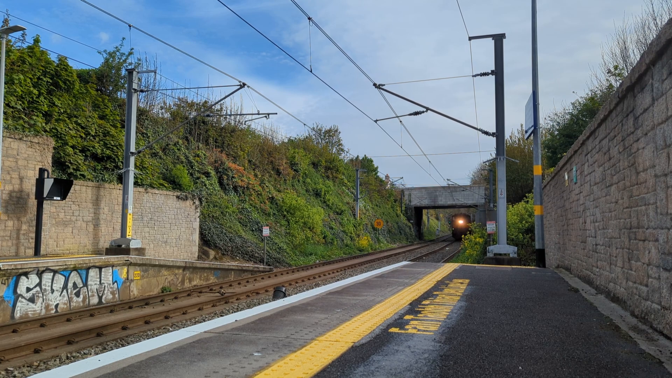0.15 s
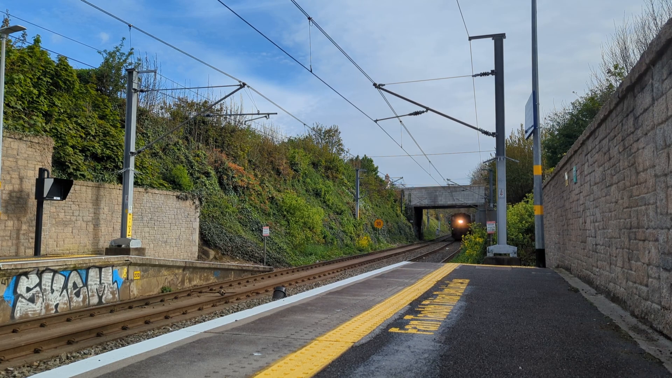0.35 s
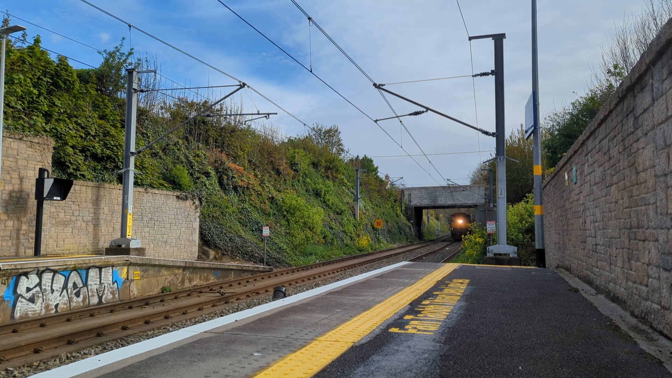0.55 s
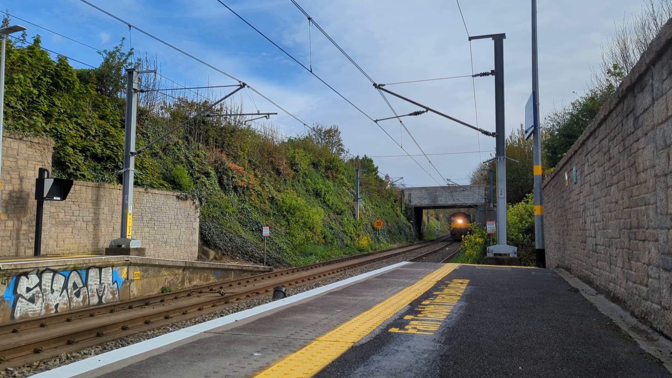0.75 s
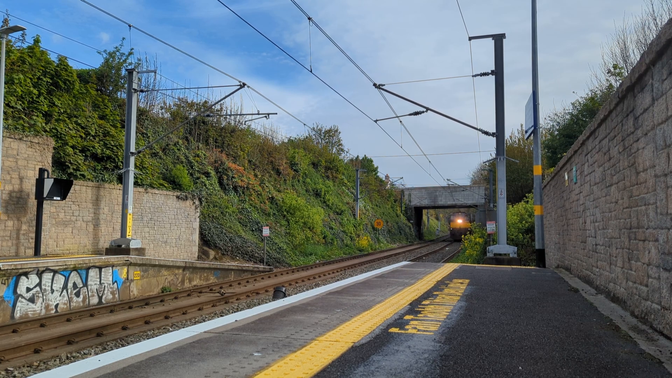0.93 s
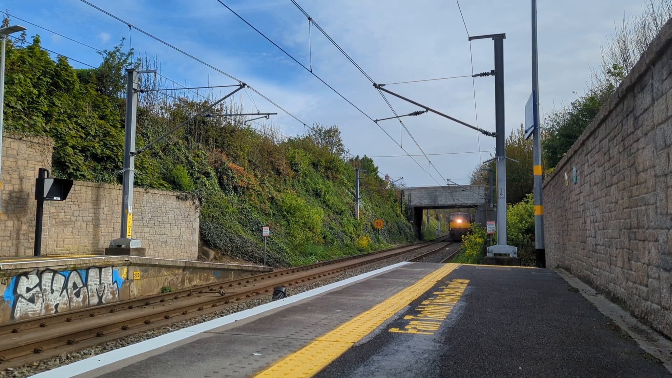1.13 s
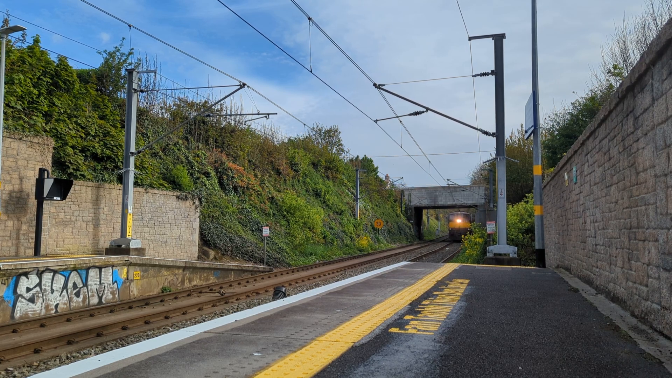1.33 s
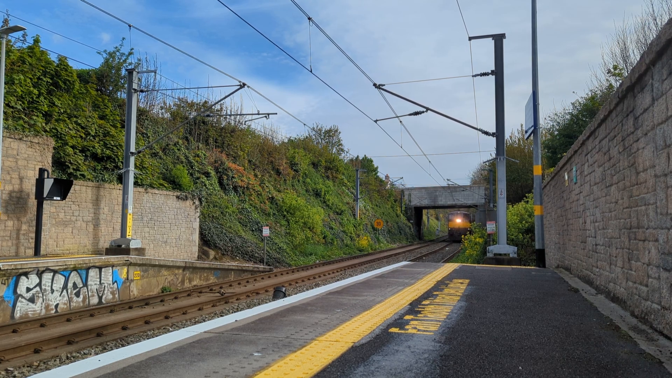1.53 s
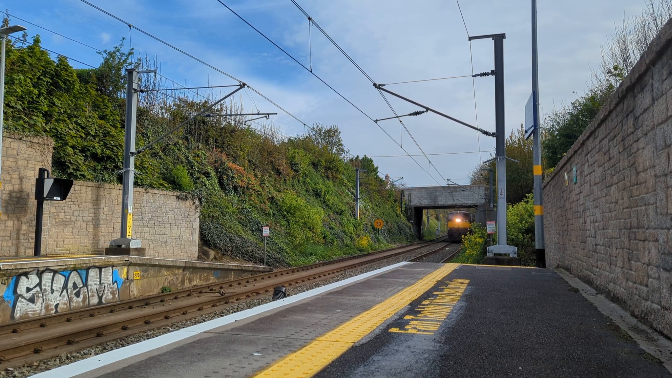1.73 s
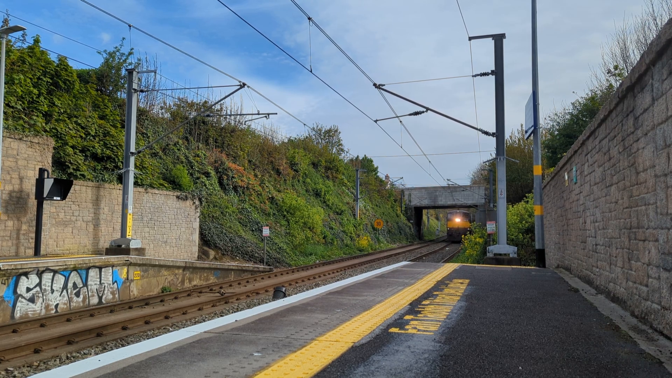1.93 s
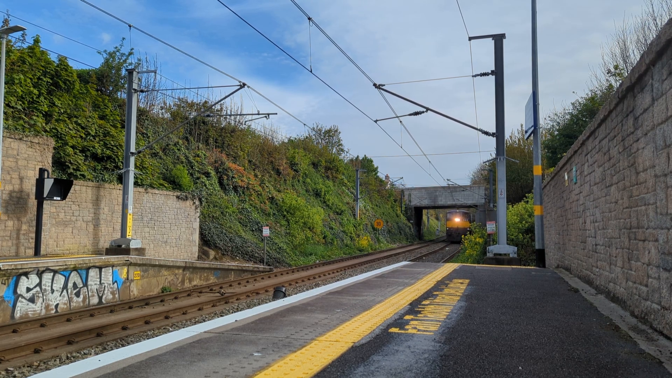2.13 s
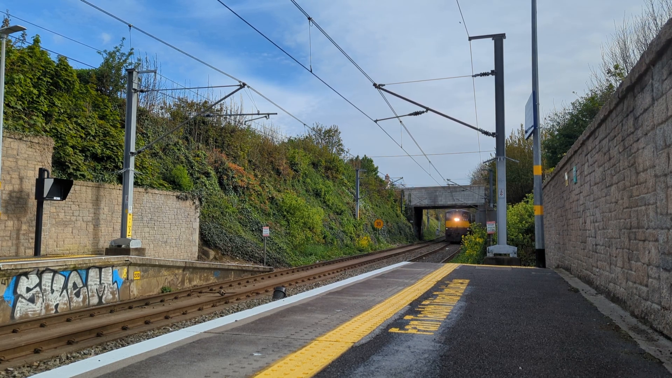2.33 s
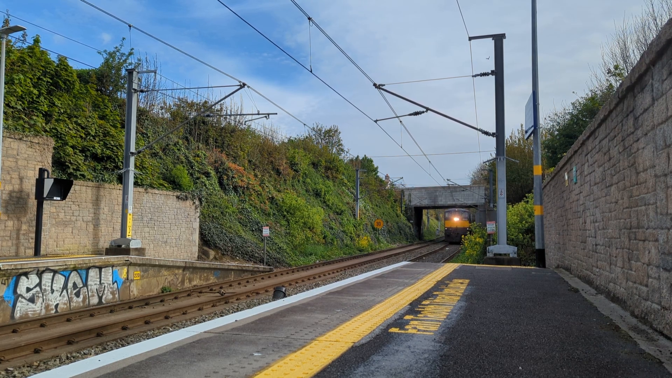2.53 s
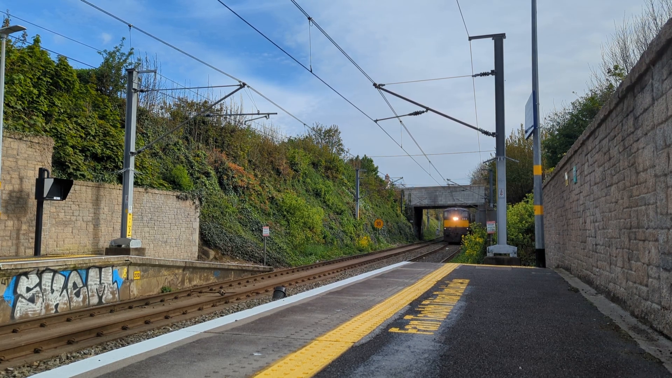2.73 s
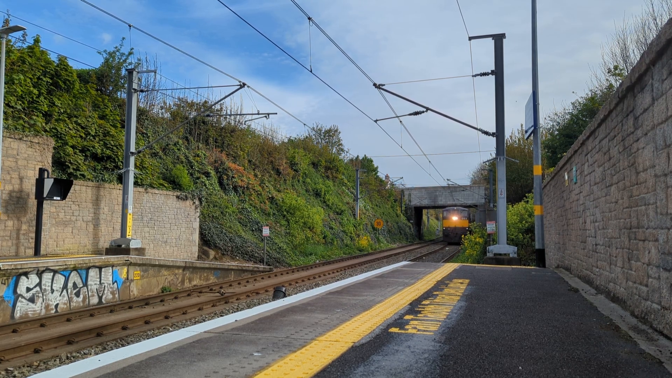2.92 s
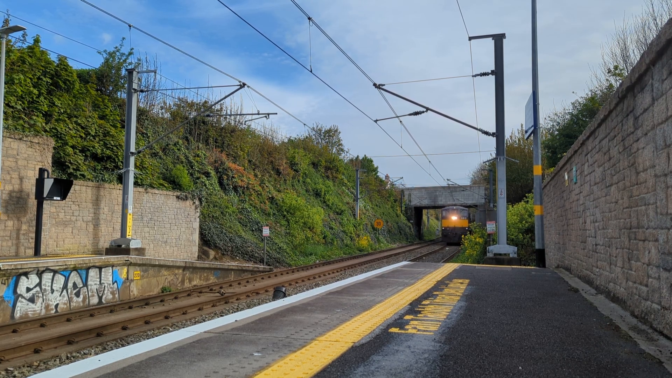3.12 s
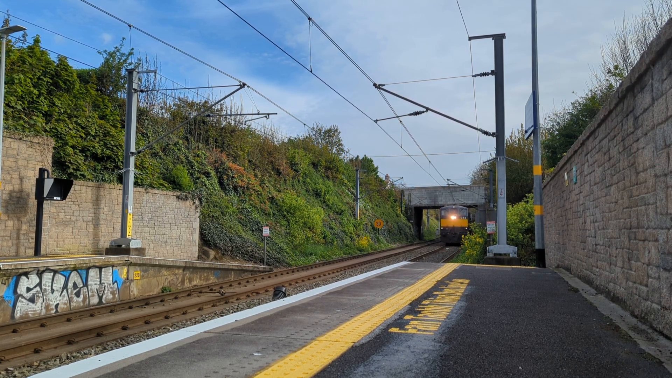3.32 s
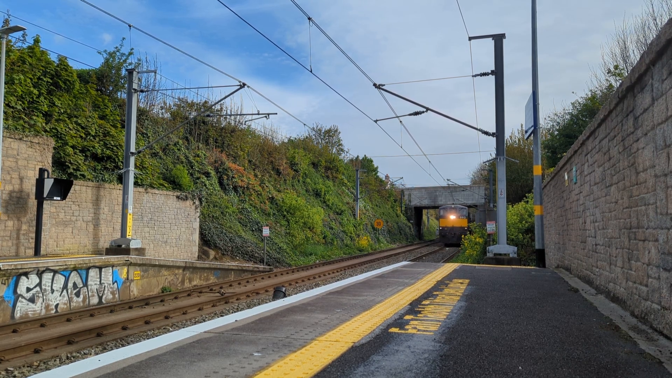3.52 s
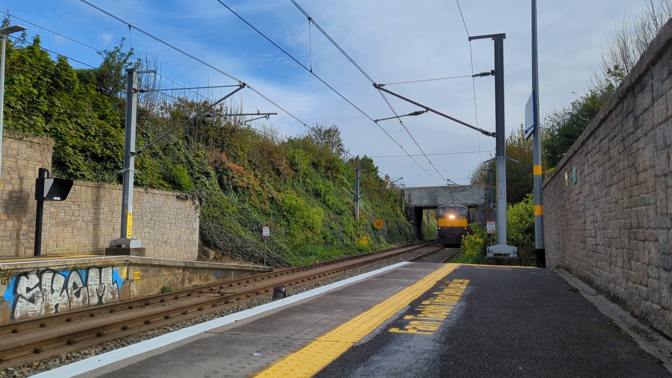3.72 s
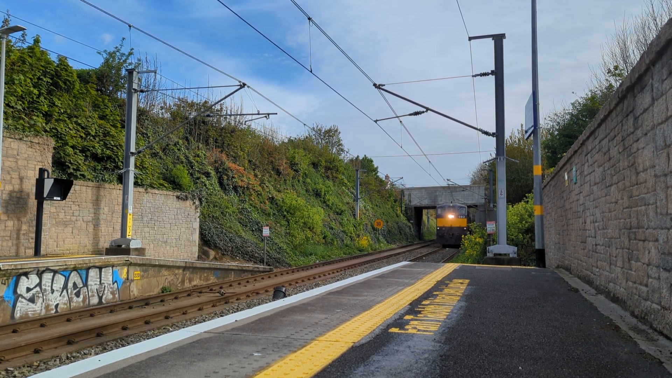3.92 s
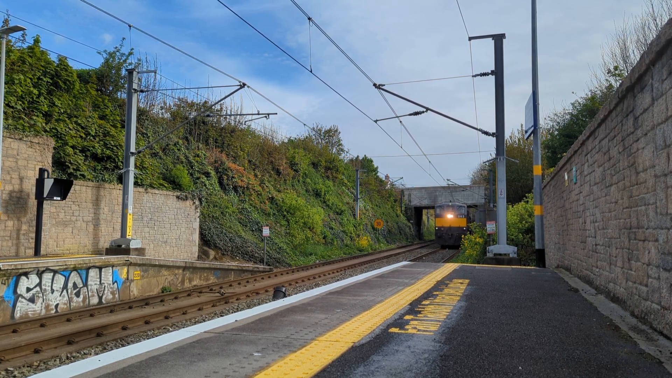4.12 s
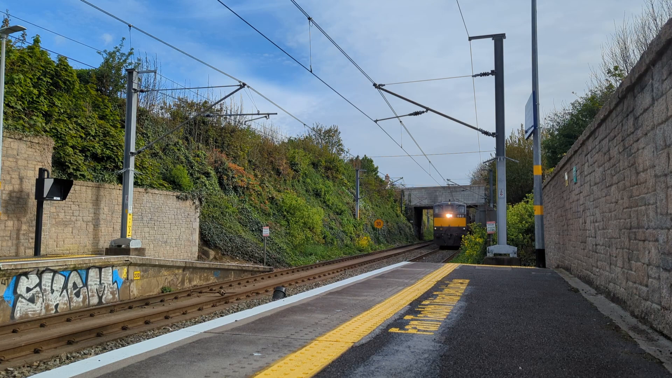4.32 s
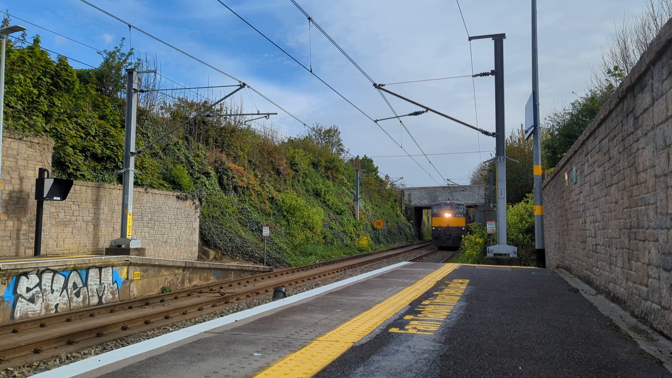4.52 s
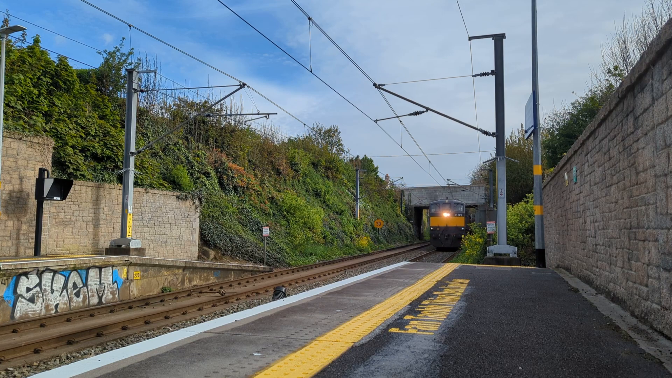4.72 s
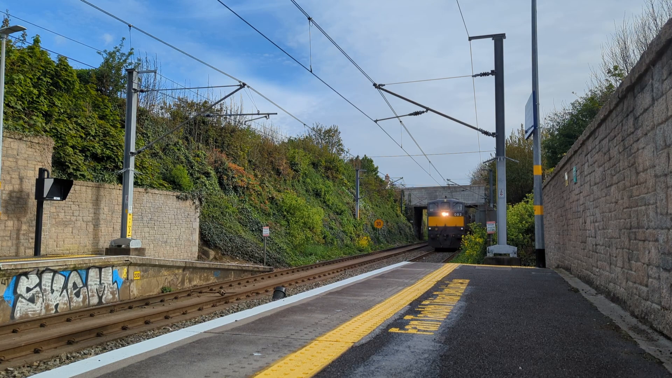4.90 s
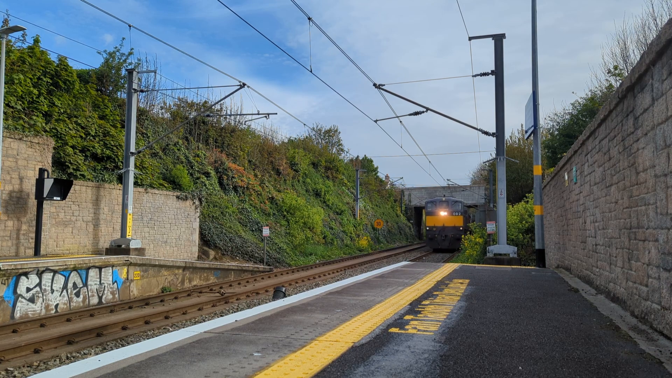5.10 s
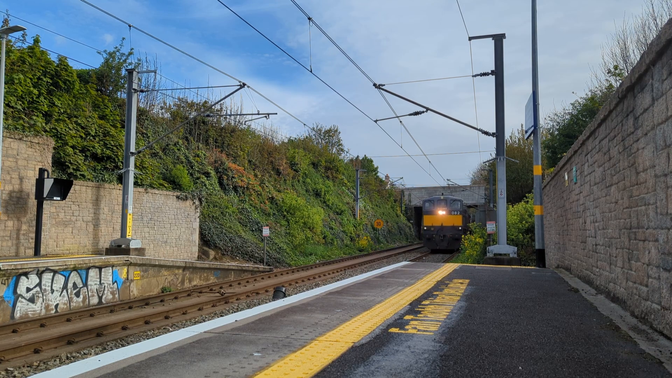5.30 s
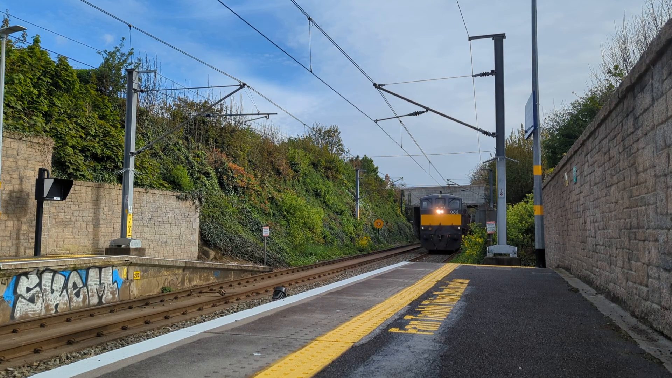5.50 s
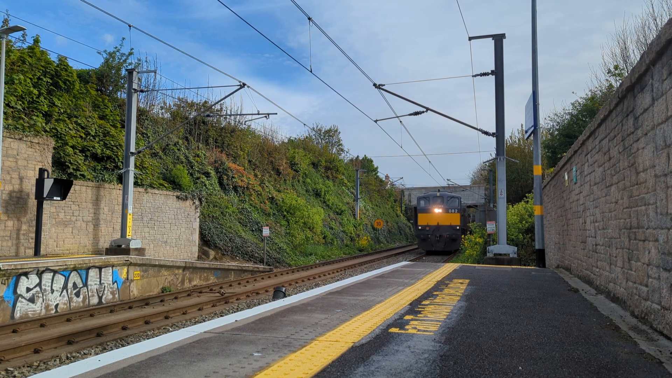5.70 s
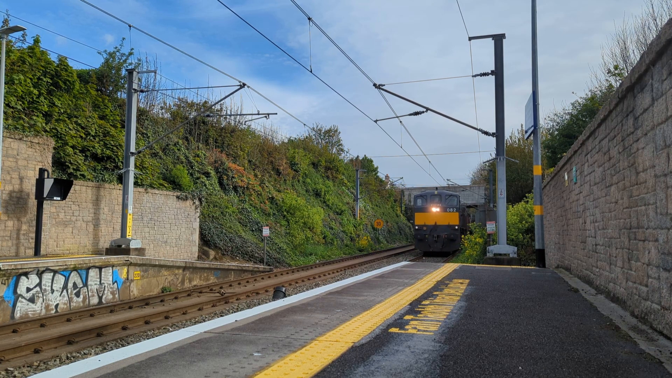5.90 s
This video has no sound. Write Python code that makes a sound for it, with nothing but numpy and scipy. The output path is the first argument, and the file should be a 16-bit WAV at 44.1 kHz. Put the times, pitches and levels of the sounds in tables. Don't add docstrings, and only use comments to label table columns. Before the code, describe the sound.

A horn echo dies between walls, then a diesel locomotive rumbles nearer, engine revving with rising turbo whine, birds whistling, and a second close horn blast.

```python
import sys
import numpy as np
from scipy import signal
from scipy.fft import rfft, irfft, next_fast_len
from scipy.io import wavfile
from scipy.ndimage import uniform_filter1d, map_coordinates

SR = 44100
rng = np.random.default_rng(int(sys.argv[2]) if len(sys.argv) > 2 else 0)


def makeup_ratio(level_db):
    decades = np.asarray(level_db, float) / 20
    return 10 ** decades


def wav_record(signal):
    frames = np.transpose(np.atleast_2d(signal))
    bounded = np.clip(frames, -1, 1)
    quanta = np.round(bounded * 32767).astype(np.int16)
    wavfile.write(sys.argv[1], SR, quanta)


N = 262395
TIME = np.arange(N) / SR

# frequency in Hz, density in dB per Hz.
AIR_SPECTRUM = [(4000, -28), (7000, -7), (10000, -3.5), (12500, -0.5), (14300, -1.5), (15000, -20.5)]
# time in seconds, half length in seconds, level in dB.
WING_FLICKS = [
    (1.675, .018, -79),
    (4.49, .012, -80),
    (2.86, .015, -80),
]
# start in seconds, length in seconds, from Hz, to Hz, level in dB.
LOW_BIRD = [(.78, .018, 4770, 4840, -63), (0.788, 0.024, 5520, 5380, -70), (0.82, 0.032, 5150, 3950, -61),
            (0.848, 0.03, 3700, 2850, -55.5), (1.632, 0.036, 4750, 4900, -52),
            (1.65, 0.029, 5000, 5400, -66), (1.649, 0.031, 2530, 2670, -56), (1.695, 0.04, 3700, 3350, -60),
            (2.303, .022, 3740, 3620, -48), (2.317, .012, 4450, 4120, -54), (2.324, 0.022, 3850, 3250, -48),
            (2.349, .012, 3870, 3980, -58.5), (2.353, 0.012, 3600, 3330, -52),
            (2.382, 0.019, 3850, 3300, -47), (2.398, .01, 3560, 3350, -59),
            (2.454, 0.014, 3980, 4060, -53.5), (2.456, .013, 3980, 4700, -51.5),
            (2.507, 0.012, 4500, 4520, -52), (2.491, 0.015, 4500, 4500, -44.5),
            (2.525, .012, 4500, 3650, -50), (2.533, 0.026, 3650, 3330, -43.5),
            (2.547, 0.012, 3330, 3480, -55), (2.565, 0.012, 3740, 3420, -48.5),
            (2.58, 0.011, 3700, 3400, -52), (2.6, 0.084, 3170, 3100, -58), (2.685, .025, 3100, 3000, -59),
            (4.461, 0.022, 4300, 4500, -56), (4.483, .018, 4620, 5300, -52),
            (4.476, 0.022, 5150, 5500, -52.5), (5.415, 0.022, 4950, 4150, -54)]
# start in seconds, length in seconds, from Hz, to Hz, level in dB.
HIGH_BIRD = [(1.975, 0.043, 8840, 7710, -69), (2.011, 0.059, 7630, 8470, -67),
             (2.09, 0.12, 8670, 8550, -68.5), (2.19, 0.073, 8630, 7600, -57),
             (2.262, 0.17, 8220, 8220, -74), (2.795, 0.084, 6680, 6400, -50.5),
             (2.832, 0.024, 8100, 6980, -56), (2.868, .022, 7490, 8600, -60),
             (2.872, 0.03, 6800, 6950, -59), (2.92, 0.018, 8370, 8440, -69),
             (2.973, 0.034, 6800, 6300, -55.5), (3.585, 0.16, 7500, 6800, -64),
             (3.59, .05, 8330, 8900, -74), (5.58, 0.14, 8800, 8300, -63)]
# start in seconds, length in seconds, ends in Hz, middle in Hz, level in dB.
TURNED_NOTES = [
    (1.661, 0.063, 2780, 3120, -52.5),
    (2.09, 0.041, 7200, 6850, -66),
    (2.793, .035, 7900, 7200, -57),
    (2.844, 0.027, 6800, 5860, -48),
    (2.89, .03, 6700, 6500, -55.5),
    (2.892, 0.026, 8450, 8100, -65),
    (4.503, 0.056, 2790, 3160, -48.5),
]
# start in seconds, length in seconds, level in dB.
FAR_BIRD = [
    (3.815, 0.083, -63),
    (3.971, 0.07, -60),
    (4.124, 0.08, -61),
    (4.264, 0.082, -59),
    (4.432, 0.052, -61),
    (4.589, 0.067, -59),
]
BIRD_PAN_DB = [0, 0.5, 2, 3.5]
# time in seconds, level in dB.
RAIL_LEVEL = [(.55, -80), (.63, -64), (.95, -65), (1.1, -60), (1.17, -60), (1.21, -70), (1.3, -59),
              (1.4, -63), (1.7, -66), (2.4, -75), (3, -90)]
# harmonic number, level in dB.
FAR_HORN_HARMONICS = [(1, 0.5), (2, 4), (3, -1.5), (4, -14.5), (5, -16), (6, -19), (7, -19), (8, -19.5),
                      (9, -24), (10, -20), (11, -22), (12, -31), (13, -28), (14, -33.5), (15, -36),
                      (16, -40.5), (17, -37), (18, -39.5), (19, -44), (20, -65), (21, -51), (22, -49),
                      (23, -50), (24, -53), (25, -50), (26, -50), (27, -50), (28, -52), (29, -54),
                      (30, -55), (31, -50)]
# level in dB, early extra in dB, fall in dB per second.
ECHO_FADE = [
    (-34, 11.5, 34),
    (-34.5, 9, 34.5),
    (-30, -1, 54),
    (-34.5, -7.5, 32.5),
]
# harmonic number, time in seconds, half length in seconds, change in dB.
ECHO_RETURNS = [(1, 0.203, 0.063, 9.5), (1, 0.098, 0.024, -2), (1, 0.285, 0.02, -11),
                (1, 0.436, 0.016, -16), (1, .58, .04, 4), (2, .16, .05, -3), (2, .47, .025, 5),
                (2, .525, .02, -5), (3, .075, .025, 4), (3, .215, .02, -6), (3, .3, .08, 3),
                (4, .02, .03, 5), (4, .55, .1, 3), (5, .1, .04, 2), (5, .35, .04, 5), (6, .15, .05, 3),
                (7, .22, .03, 3), (7, .45, .04, 4), (8, .09, .03, 3), (9, .18, .04, 4), (11, .2, .05, 4)]
# time in seconds, gain in dB.
NEARNESS = [
    (.7, 0),
    (1.66, 3),
    (2.3, 3),
    (3.1, 4),
    (3.7, 6.5),
    (4.3, 7.5),
    (5, 7.5),
    (5.6, 9.5),
    (5.8, 8),
]
# frequency in Hz, density in dB per Hz.
RUMBLE_SPECTRUM = [(15, -35.5), (30, -21), (44, -2.5), (66, -4.5), (130, -11), (241, -15), (301, -21),
                   (900, -64), (1170, -70.5), (1980, -120)]
# frequency in Hz, density in dB per Hz.
HISS_SPECTRUM = [(240, -8), (400, -1), (650, -7.5), (1500, -10), (2700, -17), (3000, -20), (4610, -23),
                 (5790, -28), (8610, -37.5), (9730, -46), (11700, -45), (15400, -68.5)]
# frequency in Hz, gain in dB.
NOTCHED_SHADE = [(300, 0), (800, 2), (1100, 0), (1500, -5), (2200, -2), (4000, 0)]
# frequency in Hz, left-right likeness from 0 to 1.
LIKENESS = [(60, 0.88), (180, 1), (550, 0.84), (1640, 0.34), (4960, 0.051), (14900, 0.02)]
# time in seconds, whine in Hz, whine level in dB.
TURBO_WHINE = [(0, 4585, -68), (.6, 4542, -77), (1.15, 4538, -68), (1.45, 4528, -58), (2, 4493, -60),
               (3, 4440, -64.5), (3.6, 4457, -62), (4.2, 4763, -59), (4.55, 4910, -59), (4.85, 5185, -58),
               (5.3, 5440, -56), (5.95, 5890, -56.5)]
# multiple of the whine, level in dB, width in Hz.
WHINE_FAMILIES = [
    [(1.015, -3, 53), (.975, -2, 80), (.99, 0, 400)],
    [(.617, 0.5, 70), (.595, -3.5, 140), (.55, -11.5, 130), (.88, -11, 60)],
    [(2.0, -5, 750), (2.25, -5, 3980), (.18, 11, 60)],
]
# time in seconds, firing line in Hz.
ENGINE_SPEED = [
    (0, 49.48),
    (4.2, 49.9),
    (4.7, 54.14),
    (5.1, 58.27),
    (5.5, 60.57),
    (5.95, 61.15),
]
# dip in seconds, dip level in dB, next crest in dB, crest place from 0 to 1.
FIRING_BEATS = [(-.1, -40, -28.5, 0.7), (.38, -36, -32.5, 0.75), (.51, -43.5, -31, 0.8),
                (.71, -37, -27.5, 0.45), (.96, -50, -30.5, 0.9), (1.08, -38.5, -22.5, .55),
                (1.34, -30, -18.5, 0.63), (1.74, -33.5, -17, 0.38), (2.09, -38, -17.5, 0.48),
                (2.53, -32.5, -18, 0.33), (2.88, -43, -18.5, 0.94), (3.23, -43, -26.5, 0.4),
                (3.35, -32, -18.5, 0.84), (3.66, -28, -14.5, 0.85), (4.32, -42, -25.5, 0.65),
                (4.42, -53, -19, 0.43), (4.6, -27, -13.5, 0.24), (4.84, -21, -20.5, 0),
                (4.99, -41, -15, 0.77), (5.19, -33, -11, 0.4), (5.34, -33, -12.5, 0.38),
                (5.52, -35, -15.5, 0.64), (5.65, -24, -12.5, 0.45), (5.82, -29.5, -17, 0.34)]
# dip in seconds, dip level in dB, next crest in dB, crest place from 0 to 1.
DRONE_BEATS = [(0, -51, -41.5, 0.41), (.53, -60, -46, 0.34), (.85, -63, -41.5, 0.93), (1.4, -42, -33, .4),
               (2.43, -38.5, -41, .5), (2.7, -51, -32.5, 0.43), (3.13, -41, -31, 0.61),
               (3.65, -36, -31.5, .2), (4.16, -39.5, -21.5, 0.7), (5.05, -28, -22, 0.62),
               (5.87, -29, -25, 0.83)]
# multiple of the firing line, idling level in dB, notched-up level in dB.
DRONE_ORDERS = [(1.63, -9, -10), (1.74, 1, -17), (1.82, -12, 4), (1.96, -9, -11), (1.3, -7.5, -5),
                (.68, -16.5, -2)]
# multiple of the firing line, idling level in dB, notched-up level in dB.
THROB_ORDERS = [(3.04, 0, -20), (2.58, -8, -5), (2.72, -12, -2), (5.05, -9, -24), (2.15, -20, -4)]
# harmonic number, left level in dB, right level in dB, left lead in radians.
HORN_HARMONICS = [(1, -13, -12, -0.1), (2, -13, -21, -0.4), (3, -22, -30, -0.8), (4, -33, -27, -0.9),
                  (5, -25, -28, 0.4), (6, -22, -37, -1.0), (7, -23, -21, -2.6), (8, -33, -24, -0.7),
                  (9, -30, -34, -0.7), (10, -31, -31, 2.9), (11, -35, -30, 2.5), (12, -33, -30, -1.6),
                  (13, -26, -35, -2.0), (14, -38, -29, -1.7), (15, -34, -27, -2.1), (16, -40, -39, 1.7),
                  (17, -34, -36, 2.7), (18, -49, -35, 1.9), (19, -34, -34, 2.3), (20, -40, -41, 2.6),
                  (21, -37, -35, 1.5), (22, -35, -30, 0.3), (23, -41, -35, 1.3), (24, -34, -36, 1.1),
                  (25, -38, -43, -1.2), (26, -42, -36, -0.5), (27, -45, -35, 0.7), (28, -47, -36, -0.2),
                  (29, -48, -35, 0.3), (30, -59, -41, -0.3)]
# time in seconds, pitch in Hz.
HORN_PITCH = [
    (5.762, 416),
    (5.772, 425),
    (5.78, 433),
    (5.792, 452),
    (5.8, 472),
    (5.809, 494.7),
    (5.845, 494.5),
    (5.875, 493),
    (5.95, 492.2),
]
# rise in seconds, level in dB, dB before the lock, sag start in seconds, sag in dB per second.
HORN_BANDS = [
    (0.038, 4.5, 3, 5.97, 9),
    (0.021, 3, -3, 5.895, 146),
    (0.02, 3, -8, 5.88, 230),
    (0.023, 3, -13, 5.86, 127),
]
# harmonic number, ear (0 left), time in seconds, half length in seconds, change in dB.
WALL_SHIMMER = [(3, 1, 5.89, .035, -9), (3, 1, 5.81, .02, 4), (3, 0, 5.92, .05, -3), (3, 1, 5.94, .02, 5),
                (4, 0, 5.785, .02, 6), (6, 1, 5.78, .015, -10), (2, 1, 5.82, .025, 1.5),
                (4, 0, 5.85, .02, -6), (4, 0, 5.91, .035, 5), (4, 1, 5.835, .02, -2), (4, 1, 5.89, .03, 2),
                (5, 0, 5.905, .04, -8), (5, 1, 5.92, .04, -3), (6, 1, 5.82, .012, -6), (6, 1, 5.92, .04, 6),
                (7, 0, 5.89, .03, -2), (7, 1, 5.93, .03, -4), (8, 0, 5.81, .03, -5), (8, 0, 5.88, .04, 3),
                (9, 0, 5.89, .03, 3), (10, 0, 5.91, .015, -6), (11, 1, 5.87, .03, 3)]
# frequency in Hz, density in dB per Hz.
PUFF_SPECTRUM = [(500, -10), (1500, 0), (3000, -2), (4500, -6), (8000, -16), (15000, -32)]
# time in seconds, gain in dB.
GAIN_CONTROL = [
    (0, -1.5),
    (.3, -0.5),
    (.55, -0.5),
    (.8, 0.5),
    (5.79, 0.5),
    (5.82, -4),
    (5.95, -4.5),
]


def unit(x):
    return x / np.sqrt(np.mean(np.abs(x) ** 2) + 1e-20)


def along(points, hz):
    f, v = np.transpose(points)
    return np.interp(np.log(hz + 1), np.log(f + 1), v)


def curves(rows, t=TIME):
    s, *cols = np.transpose(rows)
    return [np.interp(t, s, c) for c in cols]


def bump(t, centre_s, span_s, power=2):
    return np.exp(-((t - centre_s) / span_s) ** power)


def ramp(t, start_s, length_s):
    return np.clip((t - start_s) / length_s, 0, 1)


def wobble(rate_hz, size=N):
    knots = int(size * rate_hz / SR) + 4
    fine_place = np.arange(knots * 8)
    fine = map_coordinates(rng.standard_normal(knots), [fine_place / 8])
    return np.interp(np.arange(size) * rate_hz / SR * 8, fine_place, fine)


def fuzz(rate_hz, depth, size=N):
    wander = wobble(rate_hz, size) + 1j * wobble(rate_hz, size)
    return (1 + depth * wander) / np.sqrt(1 + 2 * depth ** 2)


def turning(hz):
    return np.sqrt(2) * np.exp(2j * np.pi * np.cumsum(hz) / SR)


def filtered(x, response):
    m = next_fast_len(N + SR // 2)
    return irfft(rfft(x, m) * response(np.fft.rfftfreq(m, 1 / SR)), m)[..., :N]


def rush(spectrum, patchy_db):
    z = signal.stft(rng.standard_normal((2, N)), nperseg=512)[2]
    field = uniform_filter1d(rng.standard_normal(z.shape[1:]), 6, 0)
    field = uniform_filter1d(field, 14, 1)
    pair = signal.istft(z * makeup_ratio(patchy_db * unit(field)), nperseg=512)[1][:, :N]

    def mid_side(hz):
        angle = np.arccos(np.clip(along(LIKENESS, hz), -1, 1)) / 2
        return makeup_ratio(along(spectrum, hz)) * [np.cos(angle), np.sin(angle)]

    mid, side = filtered(pair, mid_side)
    return np.array([mid + side, mid - side]) / mid.std()


def beats(rows, round_top):
    s, dip_db, crest_db, place = np.transpose(rows)
    edges = np.append(s, N / SR)
    crest_s = s + np.clip(place, .1, .95) * np.diff(edges)
    phase = np.interp(TIME, np.sort(np.append(edges, crest_s)), np.arange(2 * len(s) + 1) / 2)
    low = np.interp(TIME, s, makeup_ratio(dip_db))
    high = makeup_ratio(crest_db)[np.minimum(phase.astype(int), len(s) - 1)]
    return uniform_filter1d(low + (high - low) * np.abs(np.sin(np.pi * phase)) ** round_top, 900)


def air():
    flicks = sum(makeup_ratio(db) * bump(TIME, s, span) for s, span, db in WING_FLICKS)
    return (makeup_ratio(-92) + flicks) * rush(AIR_SPECTRUM, patchy_db=1.5)


def far_chirps():
    notes = []
    for s, span, db in FAR_BIRD:
        sink_hz = 300 * max(s - 4.3, 0)
        for hz, tone_db in ((6320 - sink_hz, -0.23), (5790 - sink_hz, -4), (5280, -11)):
            notes.append((s, span, hz + 30, hz, db + tone_db))
    return notes


def birds():
    def slide(u):
        return 1 - (1 - u) ** 1.3

    def turn(u):
        return np.sin(np.pi * u)

    dry = np.zeros((2, N))
    songs = LOW_BIRD, HIGH_BIRD, TURNED_NOTES, far_chirps()
    for notes, path, pan_db in zip(songs, (slide, slide, turn, slide), BIRD_PAN_DB):
        ear_db = np.array([[pan_db / 2], [-pan_db / 2]])
        for s, span, from_hz, to_hz, db in notes:
            a, size = round(s * SR), round(span * SR)
            hz = from_hz + (to_hz - from_hz) * path(np.arange(size) / size)
            tone = turning(hz) * fuzz(230, 0.25 + 4 * span, size) * signal.windows.tukey(size, 0.47)
            dry[:, a:a + size] += makeup_ratio(db + ear_db) * (tone * [[1], [np.exp(.8j)]]).real
    tail = rng.standard_normal((2, SR // 3)) * makeup_ratio(-60 * TIME[:SR // 3] / 0.32)
    scatter = signal.fftconvolve(dry, tail / np.linalg.norm(tail[0]), axes=1)[:, :N]
    return dry + makeup_ratio(-7.0) * scatter


def rail():
    rail_hz, octave_db = 4565, -34
    db, = curves(RAIL_LEVEL)

    def note(k):
        return (turning(np.full(N, k * rail_hz)) * fuzz(25 * k, 0.5)).real

    return np.array([makeup_ratio(db + 1.5 * wobble(6.4)) * (note(1) + makeup_ratio(octave_db) * note(2)) for ear in "LR"])


def echoes():
    horn_hz, early_s = 486.2, 0.055
    t = TIME[:SR]
    band_db = [db + early_db * np.exp(-t / early_s) - fall * t for db, early_db, fall in ECHO_FADE]
    out = np.zeros((2, N))
    for k, level_db in FAR_HORN_HARMONICS:
        db = band_db[min(k, 4) - 1] - 200 * np.maximum(t - .85, 0)
        if k > 3:
            db = db + level_db + 11.5 - 3.3 * k * t
        db = db + sum(d * bump(t, s, span) for j, s, span, d in ECHO_RETURNS if round(j) == k)
        tone = makeup_ratio(db) * turning(np.full(SR, k * horn_hz)) * np.exp(2j * np.pi * rng.random())
        flutter = min(0.25 * k, .4) if k < 4 else 0.7
        mid = tone * fuzz(22 + 6 * k, flutter, SR) * fuzz(130, 0.099, SR)
        side = min(0.46 * k, .9) * tone * fuzz(14 + 2.62 * k, 3, SR)
        out[:, :SR] += [(mid + side).real, (mid - side).real]
    return out


def roar():
    wheel_hz, wheel_width_hz, wheel_db = 1960, 130, 3.5
    near_db, = curves(NEARNESS)
    rumble_db = -40 + 0.91 * near_db + .6 * wobble(4)
    hiss_db = -52.5 + 1.063 * near_db + .4 * wobble(6)
    rumble = makeup_ratio(rumble_db) * rush(RUMBLE_SPECTRUM, patchy_db=0.5)
    hiss = rush(HISS_SPECTRUM, patchy_db=0.8)
    hiss = filtered(hiss, lambda hz: makeup_ratio(wheel_db * bump(hz, wheel_hz, wheel_width_hz)))
    notched = ramp(TIME, 4.5, 0.8)
    shaded = filtered(hiss, lambda hz: makeup_ratio(along(NOTCHED_SHADE, hz)))
    return rumble + makeup_ratio(hiss_db) * ((1 - notched) * hiss + notched * shaded)


def turbo():
    spool_hz = 4500
    hz, whine_db = curves(TURBO_WHINE)
    gear_db = -61 + 0.5 * (whine_db + 60.5)
    octave_db = -82 + 10 * (hz - spool_hz) / 1000 + 0.6 * (whine_db + 60)
    spooled = np.clip((hz - spool_hz) / 1200, 0, 1)
    blur = fuzz(200, 0.34 * spooled)
    out = np.zeros((2, N))
    for family, db in zip(WHINE_FAMILIES, (whine_db, gear_db, octave_db)):
        for k, level_db, width_hz in family:
            for ear in (0, 1):
                level = makeup_ratio(db + level_db + 1.1 * wobble(16))
                out[ear] += level * (turning(k * hz) * fuzz(width_hz, 10) * blur).real
    return out


def exhaust():
    firing_hz, = curves(ENGINE_SPEED)
    idle_hz, full_hz = ENGINE_SPEED[1][1], ENGINE_SPEED[-1][1]
    notch = np.clip((firing_hz - idle_hz) / (full_hz - idle_hz), 0, 1)

    def order(k, idle_db, full_db):
        level = makeup_ratio(idle_db + np.sqrt(notch) * (full_db - idle_db))
        return level * turning(k * firing_hz) * fuzz(3, .25)

    swell = beats(FIRING_BEATS, round_top=1.36)
    sound = makeup_ratio(-1.5) * swell * turning(firing_hz) * fuzz(7, 0.15)
    drone = makeup_ratio(-3.0) * beats(DRONE_BEATS, round_top=1.4)
    sound = sound + drone * sum(order(*row) for row in DRONE_ORDERS)
    throb = makeup_ratio(-42.5) * (swell / makeup_ratio(-19.5)) ** 1.17
    sound = sound + throb * sum(order(*row) for row in THROB_ORDERS)
    surge = bump(TIME, 4.6, .5, power=4) * np.sin(np.pi * TIME / .165) ** 2
    sound = sound + makeup_ratio(-35) * surge * turning(2.62 * firing_hz)
    side = makeup_ratio(-28) * (wobble(6) + 1j * wobble(6)) * sound
    side = side - .0225j * sound
    return np.array([sound + side, sound - side]).real


def blast():
    lock_s, snap_s, valve_db = 5.802, 0.005, -36
    trough_rad, spike_rad, ahead_rad = 2.35, -3.1, .66
    bell_s, bell_hz = HORN_PITCH[5]
    start = round(HORN_PITCH[0][0] * SR)
    t = TIME[start:]
    size = len(t)
    hz, = curves(HORN_PITCH, t)
    unlocked = np.clip(1 - (t - lock_s) / snap_s, 0, 1)
    band_db = []
    for rise_s, db, before_db, sag_s, sag in HORN_BANDS:
        opening = np.clip(1 - (t - t[0]) / rise_s, 0, 1) ** 1.43
        band_db.append(db + valve_db * opening + before_db * unlocked - sag * np.maximum(t - sag_s, 0))
    band_db[0] = band_db[0] - 3 * bump(t, 5.862, 0.021)
    loose = np.clip((490 - hz) / 30, 0, 1)
    hz = hz * (1 + 0.018 * loose * wobble(400, size))
    gathered = ramp(t, 5.86, 0.086)
    settled = ramp(t, 5.784, 0.0087)
    pull_hz = (bell_hz - hz) * (t < bell_s)
    held = turning(hz + pull_hz) * np.exp(-2j * np.pi * pull_hz.sum() / SR)
    out = np.zeros((2, N))
    for k, left_db, right_db, lead in [*HORN_HARMONICS, (31, -50.0, -44.5, -.5)]:
        front = np.exp(1j * (trough_rad if k < 5 else spike_rad + ahead_rad * k))
        db = band_db[(k > 1) + (k > 4) + (k > 7)] - 5.5
        if k == 2:
            db = db + (5.5 - 6 * settled) * loose
        if k in (4, 6, 7):
            db = db + (9 - 6 * settled * (k != 7) - 5 * (k == 4)) * loose
        pointer = turning(k * hz) if k > 1 else held
        tone = front * pointer * fuzz(300, loose * min(0.076 + 0.05 * k, 1.5), size) * makeup_ratio(db)
        depth = 0.02 + 0.01 * k + (k > 1) * min(0.025 * k, .45) * gathered
        for ear, ear_db, shift in ((0, left_db, lead / 2), (1, right_db, -lead / 2)):
            flutter = fuzz(20 + 1.5 * k, depth, size)
            shimmer_db = sum(d * bump(t, s, span) for j, e, s, span, d in WALL_SHIMMER
                             if (round(j), round(e)) == (k, ear))
            out[ear, start:] += makeup_ratio(ear_db + shimmer_db) * (tone * np.exp(1j * shift) * flutter).real
    puff = bump(TIME, 5.79, .018, power=4) * rush(PUFF_SPECTRUM, patchy_db=3)
    return out + makeup_ratio(-38) * puff


def scene():
    gain_db, = curves(GAIN_CONTROL)
    train = exhaust() + makeup_ratio(gain_db) * (turbo() + roar())
    return air() + birds() + rail() + echoes() + train + blast()


def low_pass(x):
    return signal.sosfilt(signal.butter(12, 15540, fs=SR, output="sos"), x)


def record(dry):
    fold_hz = 8000

    def leak(hz):
        return makeup_ratio(np.maximum(-1 - 9 * ((hz - fold_hz) / 620) ** 4, -120))

    def microphone(hz):
        bass_cut = 1 / (1 + (36 / (hz + 1)) ** 8)
        return bass_cut * (1 - 0.62 * bump(hz, 4100, 52))

    mirror = 2 * filtered(dry, leak) * np.cos(4 * np.pi * fold_hz * TIME)
    folded = dry + filtered(mirror, lambda hz: np.abs(hz - fold_hz) < fold_hz / 2)
    return low_pass(filtered(folded, microphone))


dry = scene()
out = record(dry)
wav_record(out)
```